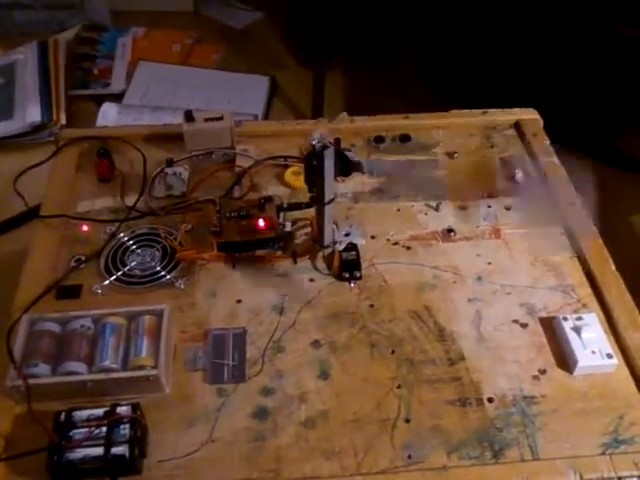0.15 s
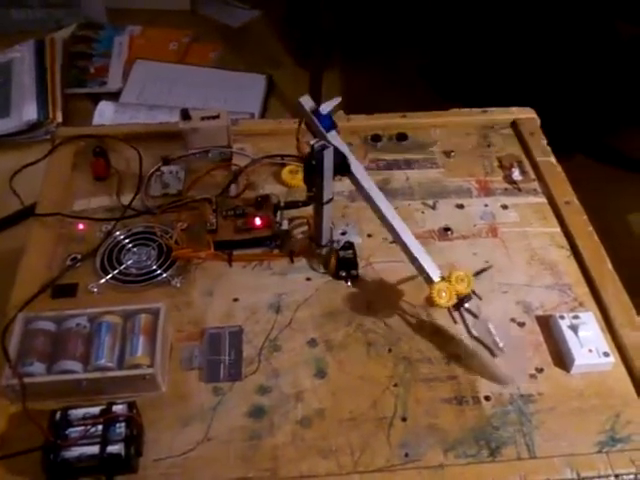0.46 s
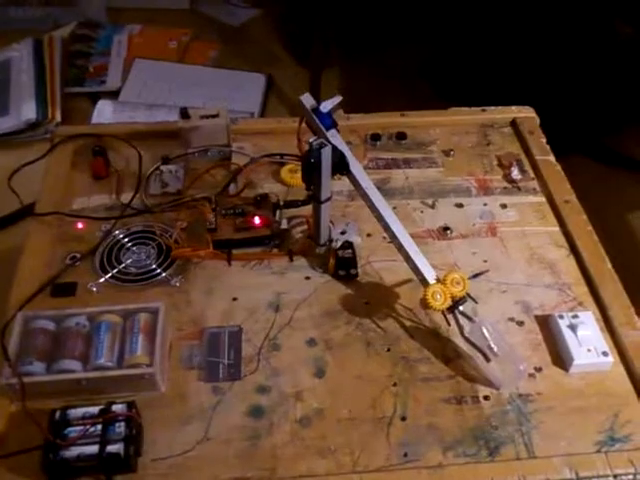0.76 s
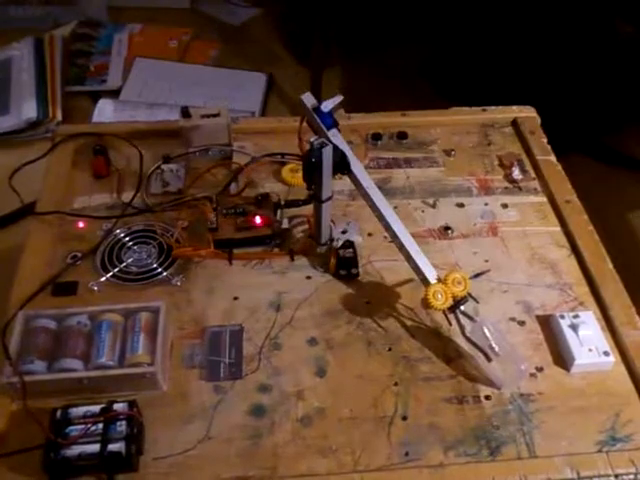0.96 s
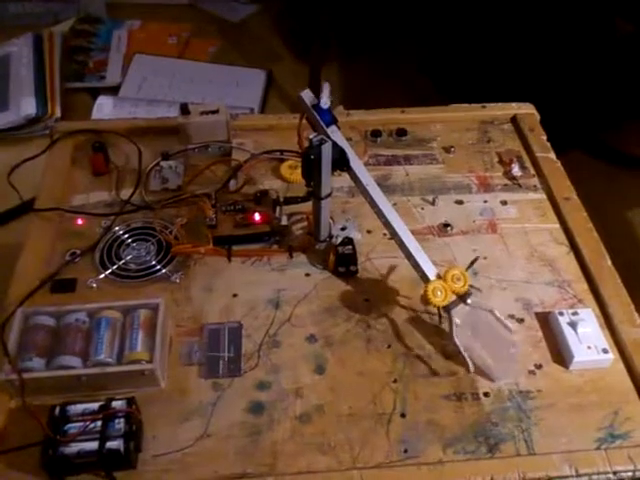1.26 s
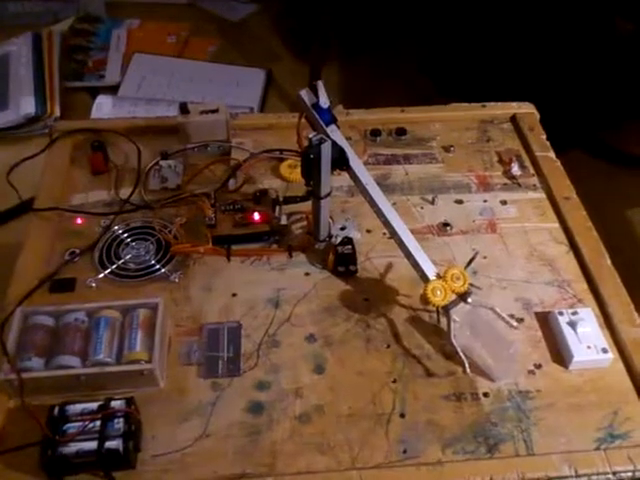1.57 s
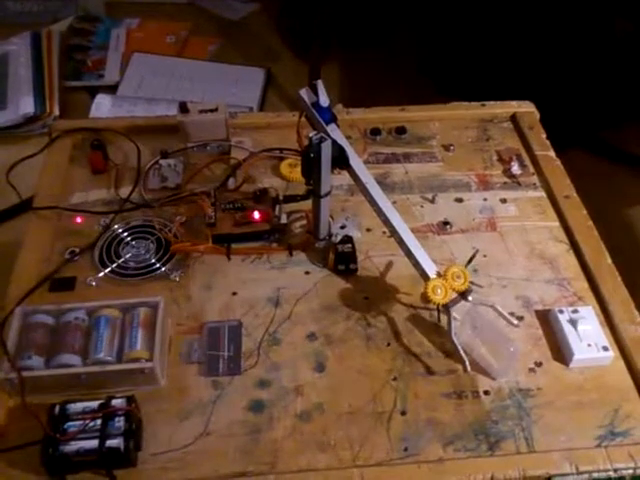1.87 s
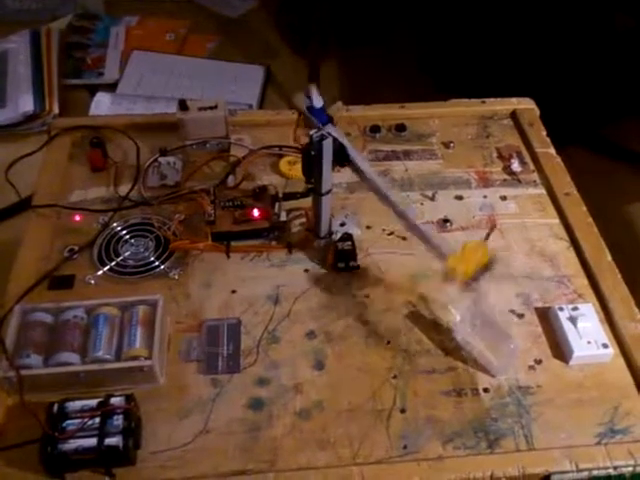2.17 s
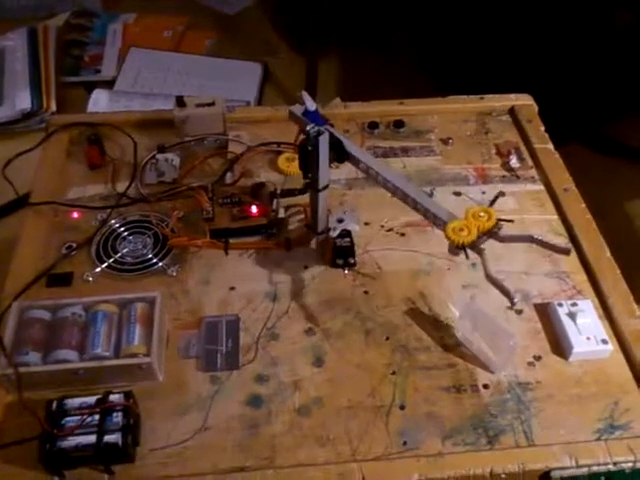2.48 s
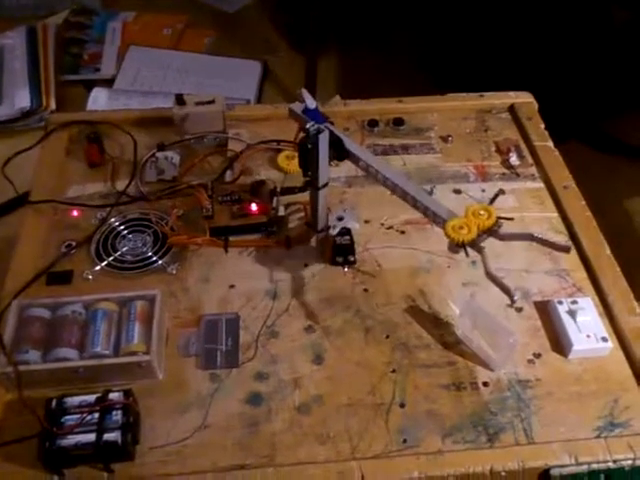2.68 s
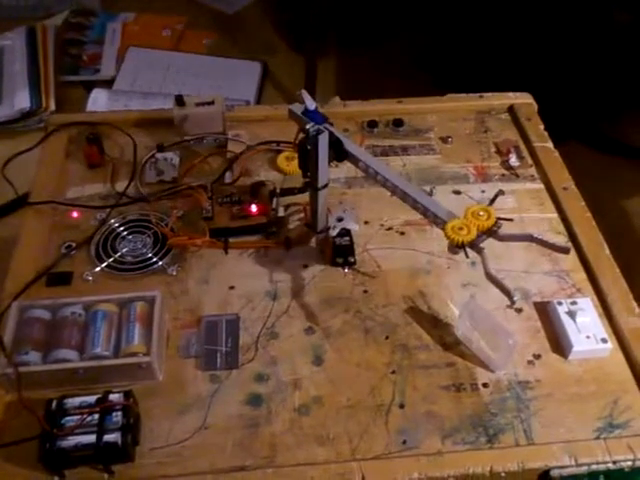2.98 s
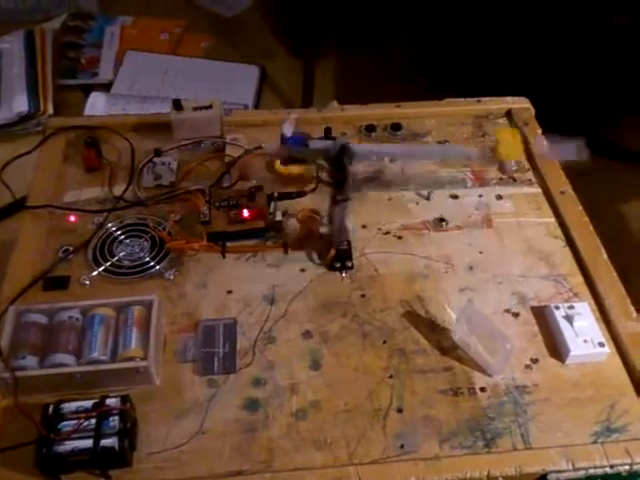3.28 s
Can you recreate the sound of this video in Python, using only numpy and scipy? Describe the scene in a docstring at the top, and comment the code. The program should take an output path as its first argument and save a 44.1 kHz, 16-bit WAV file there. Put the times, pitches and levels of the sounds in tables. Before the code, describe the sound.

Close stereo pickup in a small room: a gritty servo whir ends in a loud double knock on wood, then rapid ticks, a louder whir, soft thuds, gripper whine, and two more whirs, the last rising in pitch.

```python
"""Bursts of gear whir, a whine between them, fast ticking and knocks on wood, in a small room.
Small servos swing a light arm: in four moves, gear teeth gate a hiss and sing a rough stack of tones.
A loaded gripper servo whines with cleaner low tones; idle servos ring at each of 50 pulses a second.
The arm knocks a plastic box against a wooden bench: cracks, ringing modes and a dying rattle.
Faint chirps, bench rumble, moving air and a steady noise floor complete it."""
import sys
import numpy as np
from scipy import signal
from scipy.fft import rfft, irfft, next_fast_len
from scipy.io import wavfile

SR = 44100
rng = np.random.default_rng(int(sys.argv[2]) if len(sys.argv) > 2 else 0)


def waveform_to_disk(signal):
    """Save audio, clipped to [-1, 1], as 16-bit WAV at the path in sys.argv[1]."""
    frames = np.transpose(np.atleast_2d(signal))
    scaled = np.clip(frames, -1, 1) * 32767
    samples = np.round(scaled).astype(np.int16)
    wavfile.write(sys.argv[1], SR, samples)


N = 152145
T = np.arange(N) / SR

# Steady noise floor. Each row: frequency in Hz, relative density in dB per Hz.
FLOOR_COLOUR = [(40, 11.5), (380, 7.5), (1270, -3), (9450, -3), (16000, -12)]
FLOOR_DB = -63
# Rumble of moving arm and gears in the bench. Each row: time in seconds, level in dB.
RUMBLE_LEVEL = [(.13, -72), (.165, -50), (.66, -63.5), (1.13, -72), (1.3, -42.5), (1.55, -60),
                (2.13, -61.5), (2.155, -49), (2.45, -55.5), (2.56, -68.5), (3.14, -59), (3.19, -53.5),
                (3.26, -45.5), (3.45, -40.5)]
# Spectrum of that rumble. Each row: frequency in Hz, relative density in dB per Hz.
RUMBLE_COLOUR = [(100, -5.5), (500, 2), (1400, 1), (2500, 0.5), (5000, -0.5), (10000, -6)]
# Air moved past the microphone. Each row: time in seconds, level in dB.
PUFF_LEVEL = [(.1, -72), (.3, -45.5), (.8, -69.5), (2.12, -67), (2.22, -58.5), (2.75, -60), (3.15, -82)]
# Likeness of left and right. Each row: frequency in Hz, likeness from 0 to 1.
STEREO_LIKENESS = [(200, 0.83), (2000, 0.19), (5000, 0.26), (10000, 0.033)]
ROOM_T60_S, ROOM_DB = 0.37, -18.5
CUTOFF_HZ = 15950

# Faint chirps of the arm. Each row: start in seconds, length in seconds,
# level of the low tone in dB, level of the high tone in dB.
CHIRPS = [(0.592, 0.042, -55, -51.5), (2.397, 0.043, -54.5, -61), (2.486, 0.048, -54.5, -55.5)]
# Pitches of a chirp: low tone in Hz, high tone in Hz.
CHIRP_HZ = 1000, 1490

# Knocks of box and arm on the bench. Each row: time in seconds, level in dB, treble tilt in dB per octave.
KNOCKS = [(0.3422, -8.5, 6.5), (0.3567, -10.5, -2.5), (0.401, -23.5, 10), (0.7066, -46, 13.5),
          (1.2407, -23, -7.5), (1.298, -22, 9.5)]
# Modes of bench and box. Each row: frequency in Hz, relative level in dB.
BENCH_MODES = [(125, -23), (200, -8), (330, -1.5), (517, 1.5), (880, 3.5), (1140, 10), (1450, 8.5),
               (2000, 4), (2400, 4), (3100, -13), (4100, -4.5)]
BENCH_T60_AT_1KHZ_S, BENCH_DAMPING_EXPONENT = 0.022, 0.79   # higher modes die sooner
CRACK_DB, RATTLE_PER_S, RATTLE_DB, RATTLE_T60_S = -16, 810, -9, 0.17
KNOCK_LAG_SAMPLES = 4   # left after right

PULSE_S = .02003   # period of the control pulses
# Idle ticking. Each row: first tick in seconds, end in seconds, level in dB, servo index.
TICKING = [(0.7308, 1.13, -46, 0), (1.458, 2.15, -44.5, 1), (2.4548, 3.13, -42, 1)]
# Resonances, one list a ticking servo. Each row: frequency in Hz, relative level in dB.
TICK_RINGS = [
    [(1560, -18), (1940, -7), (8620, -4), (9680, -10)],
    [(610, -19), (4200, -15), (5800, -4.5), (7300, 0), (8700, -10)],
]
# Ring time of each ticking servo, in cycles to fall 60 dB.
TICK_T60_CYCLES = [22, 41]

# Loaded gripper servo. Each row: time in seconds, tooth rate in Hz, lowest tone in dB, hiss in dB.
WHINE = [(1.41, 480.5, -79, -44), (1.48, 521.7, -55.5, -49.5), (1.62, 541.2, -66, -45.5),
         (2.2, 570.3, -70.5, -47.5), (2.225, 396, -65, -48), (2.36, 389.4, -61, -52),
         (2.46, 473.3, -70, -49.5), (2.55, 552, -65.5, -48.5), (2.6, 570.6, -51.5, -49),
         (2.7, 580.7, -48.5, -48), (3.128, 589.1, -47, -48), (3.15, 577.6, -70, -43)]
# Whine tones 2 to 17: relative level in dB, scaled with the hiss.
WHINE_ORDERS_DB = [-20.5, -30, -20, -21.5, -33.5, -19, -22.5, -30, -13.5, -14.5, -17.5, -15.5, -8.5, -10,
                   -22, -25]
FAINT_DB, TOP_DB = -30.5, -21   # tones 18 to 25, each; tone 26
# Change of whine tones 2 to 4 in the second hold, in dB.
SECOND_HOLD_SHIFT_DB = [-2, 9.8, 8.4]
SECOND_HOLD_S, QUARTER_DB = 2.5, -23   # start; quarter-rate hum relative to the lowest tone
# Hiss of the whine. Each row: frequency in Hz, relative density in dB per Hz.
WHINE_COLOUR = [(2100, -23.5), (4600, -17.5), (5500, -3), (6500, -16), (8000, 1), (10500, -17),
                (16000, -48)]
WHINE_WANDER_HZ_PER_ORDER, WHINE_JITTER, FADE_DB_PER_HZ = 4, .0015, .12

# The four moves. Each row: time in seconds, tooth rate in Hz, level in dB.
MOVE_1 = [(.128, 590.3, -69), (0.137, 642.6, -48), (.165, 743.6, -38), (0.227, 972, -39.5),
          (0.242, 1107, -26.5), (0.266, 1111, -34.5), (0.279, 1186, -28.5), (0.311, 1140, -42.5),
          (0.333, 1093, -28.5), (0.459, 960, -50.5)]
MOVE_2 = [(1.128, 1192, -61), (1.14, 1255, -33), (1.164, 1272, -19.5), (1.224, 1285, -22.5),
          (1.26, 1133, -21.5), (1.366, 1115, -25), (1.388, 1097, -41), (1.45, 970, -79)]
MOVE_3 = [(2.143, 900, -68), (2.164, 928, -29), (2.181, 897, -45.5), (2.274, 983, -34.5),
          (2.33, 982, -43.5), (2.37, 890, -60)]
MOVE_4 = [(3.13, 957, -50), (3.144, 1004, -26.5), (3.166, 1064, -21), (3.238, 1315, -20),
          (3.291, 1374, -21), (3.333, 1384, -36.5), (3.384, 1508, -33), (3.45, 1563, -33.5)]
# One row a move: tooth tones against gear hiss in dB, strongest multiple of the tooth rate.
MOVE_TONES = [(-4, 7), (-1, 6), (-12, 8), (-5, 7)]
# One a move: casing tilt below its peak, in dB per octave.
CASING_TILTS = [-7, 2, -1.5, 3.5]
# Colour of the servo casings. Each row: frequency in Hz, relative density in dB per Hz.
CASING = [(2500, -32), (4400, -15.5), (5400, -5), (6300, -2.5), (7400, 1), (8400, 0), (11000, -9.5),
          (14200, -16), (16000, -5)]
CASING_PEAK_HZ = 7400
TONE_WANDER_HZ, JITTER, LIFT_DB = 54, 0.0087, 6   # lift: the strongest multiple
TOOTH_GATE, PULSE_GATE = 0.61, 0.04   # modulation depths
LUMP_DB, GRAIN_DB, GRAIN_HZ, STREAK_DB = 0.5, 3.5, 350, 4   # uneven drive, teeth, tones
# Flare of the fourth tone of move 2: start in seconds, length in seconds, level in dB.
SQUEAL = 1.18, 0.038, -38
# Low tones of move 4. Each row: multiple of the tooth rate, relative level in dB.
MESH_TONES = [(0.184, -8.5), (.372, -1), (0.601, -8), (1.001, -7.5), (2., 4.5)]
# Swell of those low tones. Each row: time in seconds, level in dB.
MESH_4_LEVEL = [(3.22, -62), (3.29, -52.5), (3.345, -46), (3.37, -50), (3.45, -47.5)]
# Tooth tone of move 1. Each row: time in seconds, level in dB.
MESH_1_LEVEL = [(.15, -84), (.3, -62), (.345, -48)]


def amp(db):
    """dB to gain."""
    return 10 ** (np.asarray(db) / 20)


def unit(x):
    """Scale to rms 1."""
    return x / np.sqrt(np.mean(x ** 2) + 1e-20)


def curves(rows):
    """Columns of a table against time, and a gate that is open inside it."""
    s, *cols = np.transpose(rows)
    gate = np.clip(np.minimum(T - s[0], s[-1] + .004 - T) / .004, 0, 1)
    return [np.interp(T, s, c) for c in cols] + [gate]


def burst(start_s, length_s, ramp_s):
    """Flat envelope with linear ramps outside its span."""
    return np.clip(np.minimum(T - start_s, start_s + length_s - T) / ramp_s + 1, 0, 1)


def at_hz(points, hz):
    """Read a spectrum in dB; it falls 24 dB per octave below its lowest point."""
    f, db = np.transpose(points)
    hz = np.maximum(hz, 1)
    return np.interp(np.log(hz), np.log(f), db) - 24 * np.maximum(np.log2(f[0] / hz), 0)


def drift(rate_hz, channels=1):
    """Slow random wander of rms 1: noise through two equal poles, at SR / 16."""
    r = np.exp(-32 * np.pi * rate_hz / SR)
    noise = rng.standard_normal((channels, N // 16 + 1002))
    slow = unit(signal.lfilter([1], [1, -2 * r, r * r], noise)[:, 1000:])
    return np.array([np.interp(np.arange(N) / 16, np.arange(len(c)), c) for c in slow])


def spread(mid, side, hz):
    """Left and right spectra, alike in the bass and apart in the treble."""
    f, likeness = np.transpose(STEREO_LIKENESS)
    alike = np.clip(np.interp(np.log(hz + 1), np.log(f), likeness), 0, 1)
    return np.sqrt(1 + alike) * mid + np.sqrt(1 - alike) * side * [[1], [-1]]


def hiss(colour, gate=1):
    """Stereo noise, gated then coloured; rms 1."""
    hz = np.fft.rfftfreq(N, 1 / SR)
    mid, side = rfft(rng.standard_normal((2, N)) * gate) * amp(at_hz(colour, hz))
    return unit(irfft(spread(mid, side, hz), N))


def tone(phase, wander_hz, steady):
    """A partial whose height and phase waver, a little apart in left and right."""
    a, b, c, d = drift(wander_hz, channels=4)
    side = 0.56 * (c + 1j * d) * np.array([[1], [-1]])
    waver = (a + 1j * b + side) / 1.17
    z = steady + (1 - steady) * waver
    return np.sqrt(2) * np.real(z * np.exp(1j * phase))


def tooth_phase(hz, jitter, jitter_hz):
    """Phase of a tooth rate that wanders by a small random fraction."""
    return 2 * np.pi * np.cumsum(hz * (1 + jitter * drift(jitter_hz)[0])) / SR


def ring(clicks, hz, t60_s):
    """A unit click sets a decaying sine of height 1 ringing."""
    r, w = amp(-60 / (t60_s * SR)), 2 * np.pi * hz / SR
    return signal.lfilter([0, np.sin(w)], [1, -2 * r * np.cos(w), r * r], clicks + 1e-18)


def noise_floor():
    """Steady coloured noise."""
    return amp(FLOOR_DB) * hiss(FLOOR_COLOUR)


def rumble():
    """Arm and gears shake the bench: coloured noise of uneven level."""
    return amp(curves(RUMBLE_LEVEL)[0] + 2 * drift(46)) * hiss(RUMBLE_COLOUR)


def puffs():
    """Moving air at the microphone: swelling low noise."""
    return amp(curves(PUFF_LEVEL)[0]) * hiss([(25, 2), (60, -14), (150, -23.5)])


def room(x):
    """Reverberation from forty feedback delays, twenty a side, mixed to stereo."""
    size = next_fast_len(N + SR)
    w = 2 * np.pi * np.fft.rfftfreq(size)
    sides = np.zeros((2, len(w)), complex)
    for k, lag in enumerate(rng.uniform(.012, 0.05, size=40) * SR):
        loop = amp(-60 * lag / SR / ROOM_T60_S) * np.exp(-1j * w * int(lag))
        sides[k % 2] += (-1) ** (k // 2) * loop / (1 - loop)
    response = spread(*sides, w * SR / (2 * np.pi))
    return irfft(response * rfft(x, size), size)[:, :N]


def chirps():
    """Pairs of short wavering tones, about a fifth apart."""
    out = 0
    for start_s, length_s, *levels_db in CHIRPS:
        pair = sum(amp(db) * tone(2 * np.pi * hz * T, 41, 0.52) for hz, db in zip(CHIRP_HZ, levels_db))
        out = out + burst(start_s, length_s, 0.0035) * pair
    return out


def knocks():
    """Each blow cracks, rings the bench and box, and leaves a dying rattle."""
    s, db, tilt = np.transpose(KNOCKS)
    at, out, blows = (s * SR).astype(int), np.zeros(N), np.zeros(N)
    blows[at] = amp(db)
    r = amp(-60 / (RATTLE_T60_S * SR))
    hits = rng.random(N) < RATTLE_PER_S / SR
    rattle = signal.lfilter([1], [1, -r], blows) * amp(RATTLE_DB) * hits

    for hz, mode_db in BENCH_MODES:
        clicks = rattle * rng.standard_normal(N)
        struck = at + int(rng.uniform(0, 40))
        clicks[struck] = amp(db + tilt * np.log2(hz / 1000) + rng.normal(0, 1, len(s)))
        t60_s = BENCH_T60_AT_1KHZ_S * (1000 / hz) ** BENCH_DAMPING_EXPONENT
        out += amp(mode_db - 20.0) * ring(clicks, hz, t60_s)

    blows[at] = amp(db + 2 * tilt + CRACK_DB)
    crack = signal.lfilter([1], [1, -.97], blows + rattle) * rng.standard_normal(N)
    ringing = signal.sosfilt(signal.butter(4, 100, "high", fs=SR, output="sos"), out)
    crack = signal.sosfilt(signal.butter(2, [1500, 9000], "band", fs=SR, output="sos"), crack)
    mono = ringing + crack
    return np.array([np.roll(mono, KNOCK_LAG_SAMPLES), mono])


def ticks():
    """Each control pulse jerks a holding servo, whose resonances ring."""
    out = np.zeros((2, N))
    for first_s, last_s, db, servo in TICKING:
        at, servo = (np.arange(first_s, last_s, PULSE_S) * SR).astype(int), int(servo)
        for hz, ring_db in TICK_RINGS[servo]:
            clicks = np.zeros((2, N))
            clicks[:, at] = amp(db + ring_db + rng.normal(0, 1, (2, len(at))))
            out += ring(clicks, hz, TICK_T60_CYCLES[servo] / hz)
    return out


def whine():
    """A slow, loaded gear train: clean low tones, rougher high ones, and tooth-gated hiss."""
    hz, low_db, hiss_db, gate = curves(WHINE)
    phase = tooth_phase(hz, WHINE_JITTER, 16.7)
    later = np.clip((T - SECOND_HOLD_S) / .1, 0, 1)
    orders_db = WHINE_ORDERS_DB + [FAINT_DB] * 8 + [TOP_DB]
    shifts_db = SECOND_HOLD_SHIFT_DB + [0] * len(orders_db)

    upper = 0
    for k, (db, shift_db) in enumerate(zip(orders_db, shifts_db), 2):
        partial = tone(k * phase, k * WHINE_WANDER_HZ_PER_ORDER, min(.7, 3 / k))
        upper = upper + amp(db + shift_db * later) * partial
    upper = upper * amp(FADE_DB_PER_HZ * np.minimum(hz - 540, 0))   # fades at low tooth rates

    noise = hiss(WHINE_COLOUR, 1 + TOOTH_GATE * np.cos(phase)) * amp(1.2 * drift(40) - 3)
    hum = amp(QUARTER_DB) * later * tone(phase / 4, 15, 0.97)
    lowest = tone(phase, 9.6, 0.97) + hum
    return gate * (amp(low_db) * lowest + amp(hiss_db) * (upper + noise))


def move(rows, tones, tilt):
    """Teeth gate a hiss and sing a rough stack; the drive pulses throb through it."""
    hz, db, gate = curves(rows)
    share_db, strongest = tones
    colour = [(f, d + tilt * min(np.log2(f / CASING_PEAK_HZ), 0)) for f, d in CASING]
    phase = tooth_phase(hz, JITTER, 30.36)
    throb = (1 + PULSE_GATE * np.cos(2 * np.pi * T / PULSE_S)) * amp(LUMP_DB * drift(86))

    stack = 0
    for k in range(2, 14):
        level_db = at_hz(colour, k * hz) + STREAK_DB * drift(14) + LIFT_DB * (k == round(strongest))
        below_cutoff = k * hz < CUTOFF_HZ
        stack = stack + amp(level_db) * below_cutoff * tone(k * phase, TONE_WANDER_HZ, .2)
    stack = stack / np.sqrt(np.mean(stack[:, gate > 0] ** 2))

    teeth = (1 + TOOTH_GATE * np.cos(phase)) * amp(GRAIN_DB * drift(GRAIN_HZ))
    both = (hiss(colour, teeth) + amp(share_db) * stack) / np.sqrt(1 + amp(2 * share_db))
    return amp(db) * gate * throb * both, phase


def mesh_and_squeal(phases):
    """Gear tones that stand out of moves 1, 2 and 4, locked to their tooth phases."""
    db, gate = curves(MESH_4_LEVEL)
    low = sum(amp(d) * tone(k * phases[3], 35 * k, .5 / max(k, 1)) for k, d in MESH_TONES)
    low = amp(db) * gate * low
    start_s, length_s, squeal_db = SQUEAL
    squeal = amp(squeal_db) * burst(start_s, length_s, .005) * tone(4 * phases[1], 40, .6)
    db, gate = curves(MESH_1_LEVEL)
    return low + squeal + amp(db) * gate * tone(phases[0], 45, 0.57)


def moves():
    """The four moves of the arm and the gear tones that stand out of them."""
    runs = zip([MOVE_1, MOVE_2, MOVE_3, MOVE_4], MOVE_TONES, CASING_TILTS)
    whirs, phases = zip(*[move(*run) for run in runs])
    return sum(whirs) + mesh_and_squeal(phases)


def scene():
    """Servos, chirps and knocks in the room, over rumble, puffs and floor."""
    near = chirps() + knocks() + ticks() + whine() + moves()
    reverb = amp(ROOM_DB) * room(near.mean(axis=0))
    return near + reverb + rumble() + puffs() + noise_floor()


def record(dry):
    """A steep low-pass cuts the top."""
    return signal.sosfilt(signal.cheby2(14, 75, CUTOFF_HZ + 400, fs=SR, output="sos"), dry)


dry = scene()
out = record(dry)
waveform_to_disk(out)
```